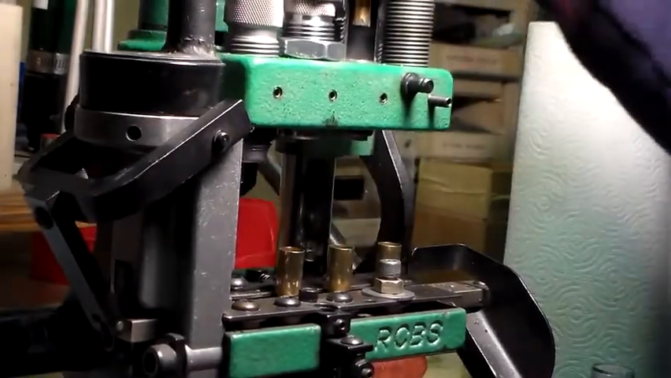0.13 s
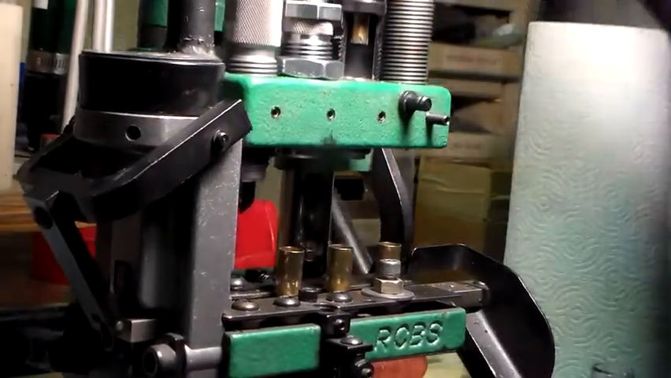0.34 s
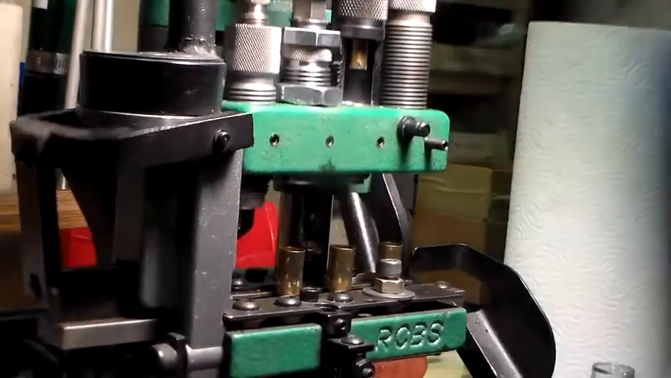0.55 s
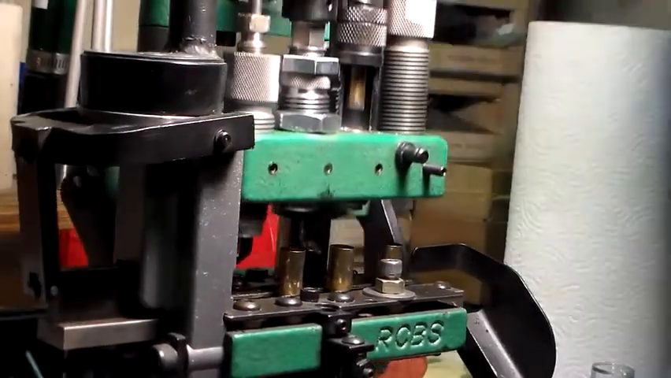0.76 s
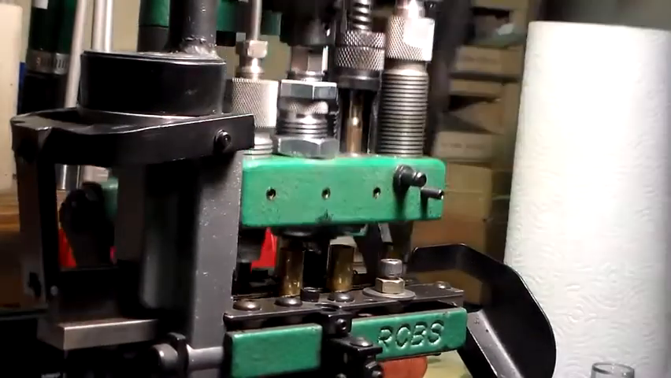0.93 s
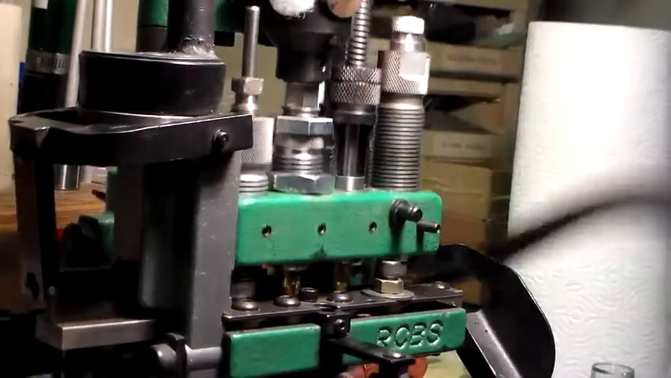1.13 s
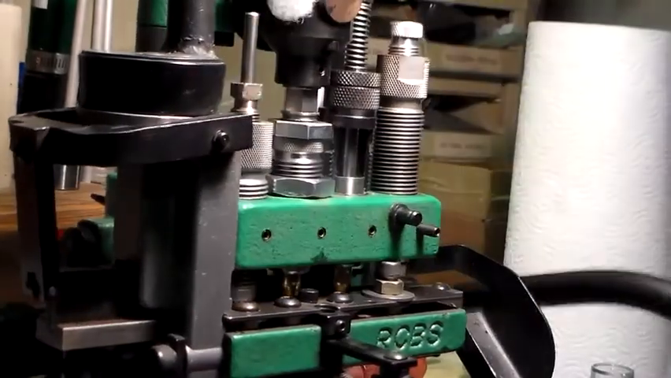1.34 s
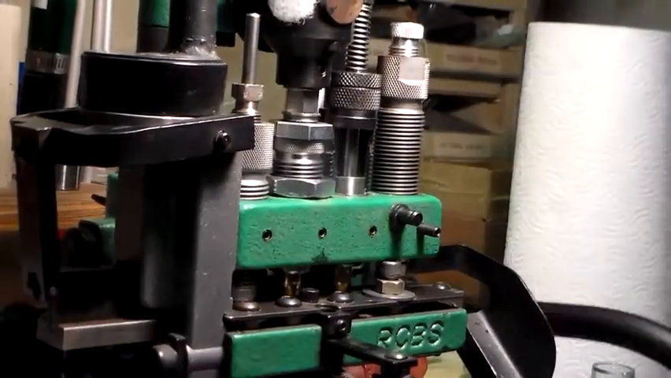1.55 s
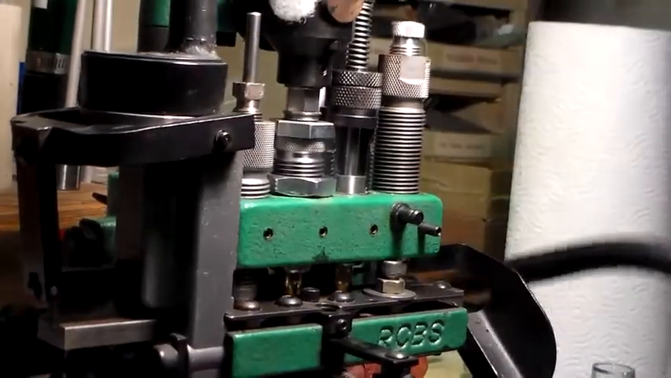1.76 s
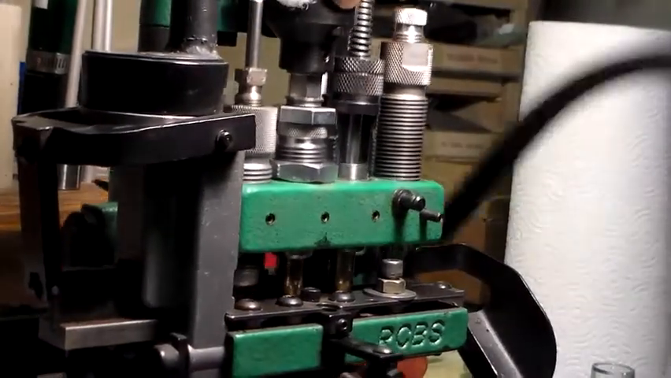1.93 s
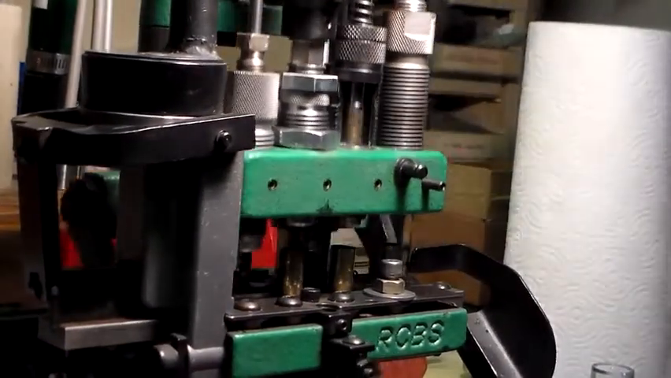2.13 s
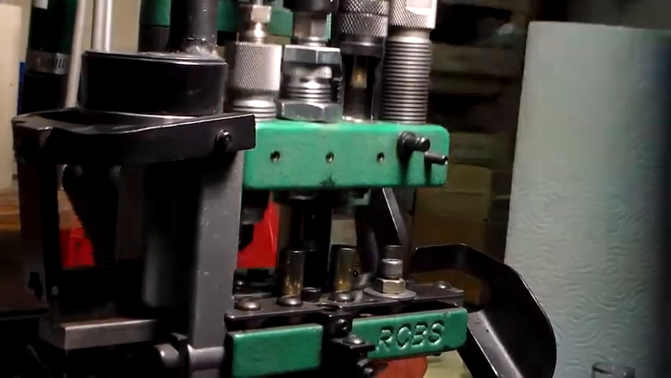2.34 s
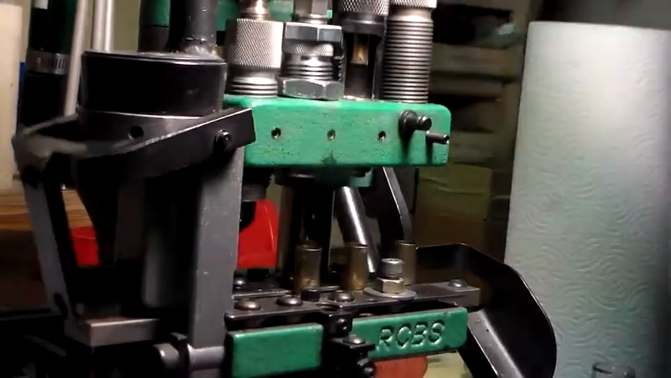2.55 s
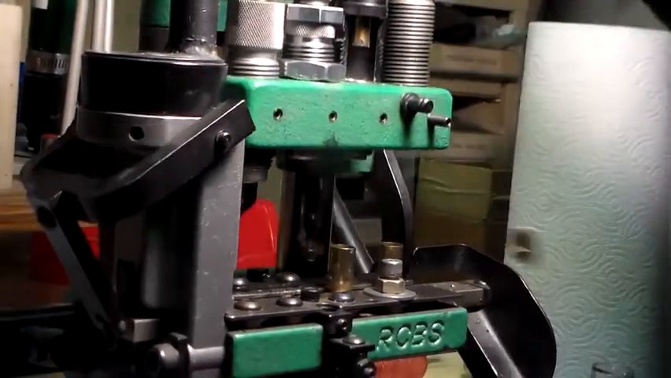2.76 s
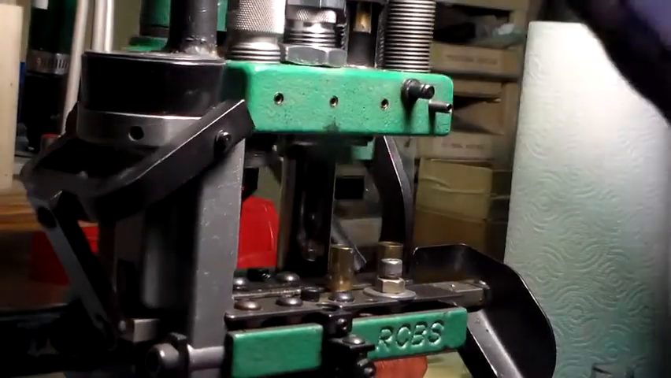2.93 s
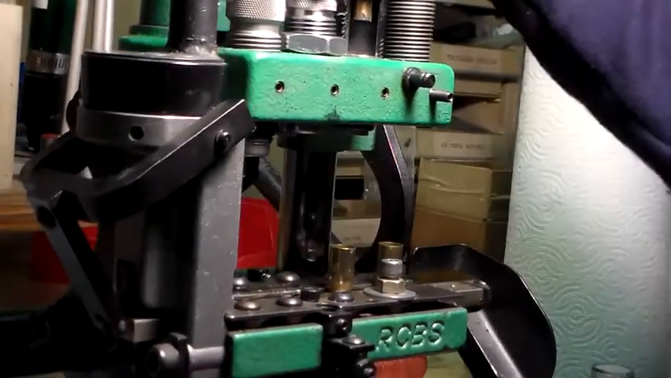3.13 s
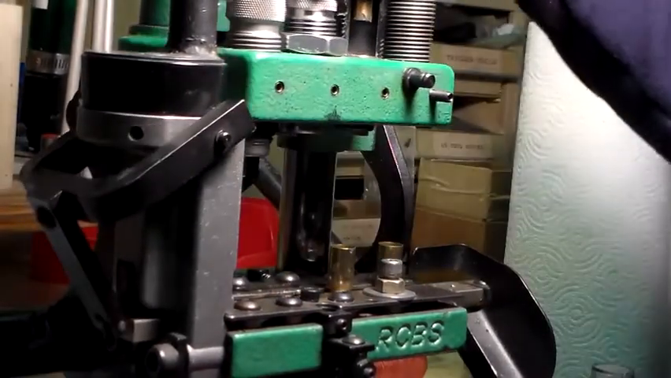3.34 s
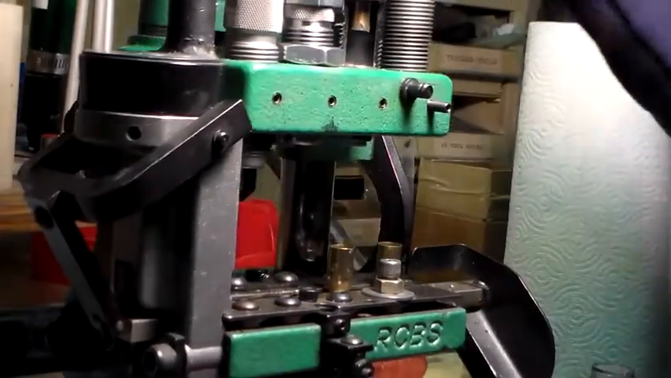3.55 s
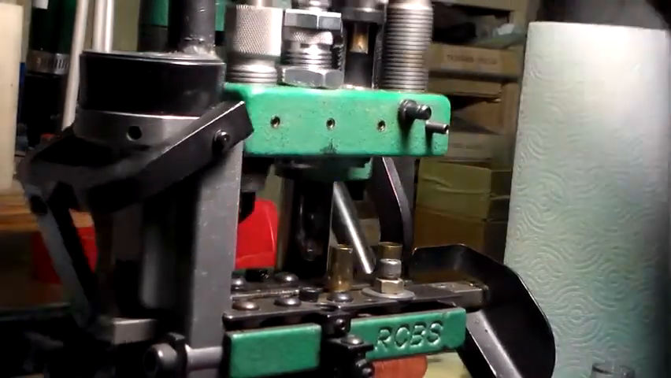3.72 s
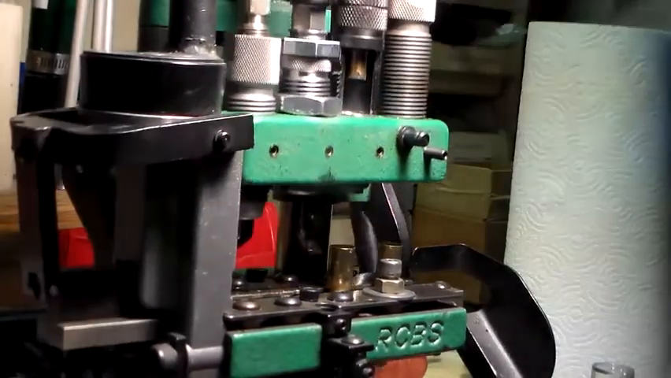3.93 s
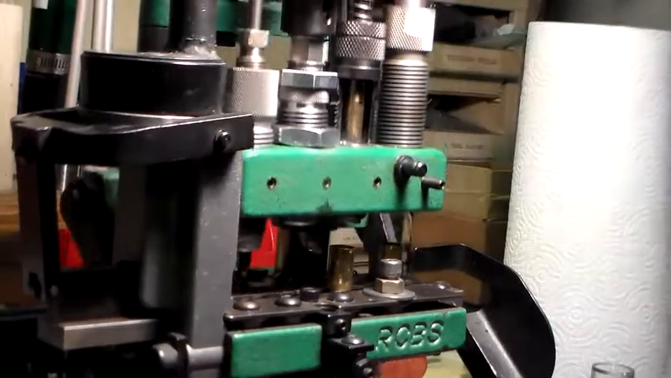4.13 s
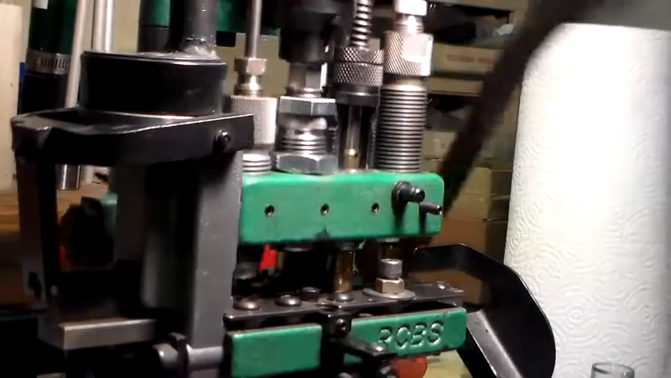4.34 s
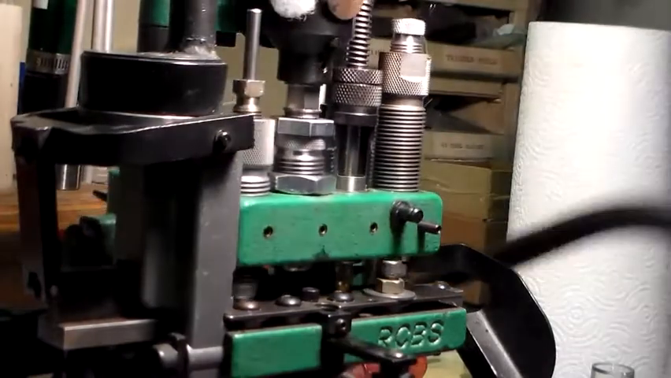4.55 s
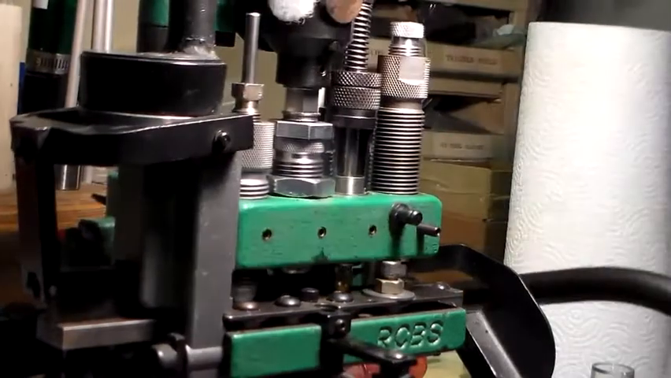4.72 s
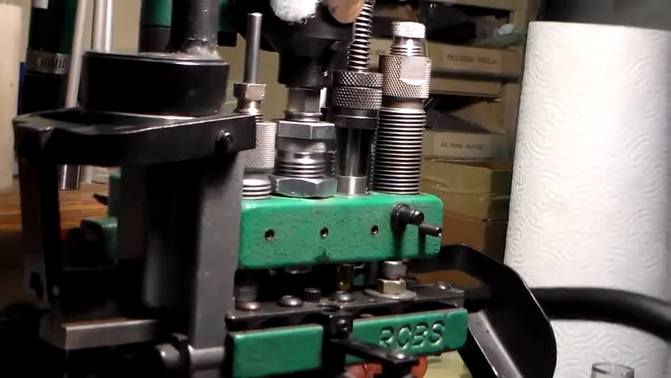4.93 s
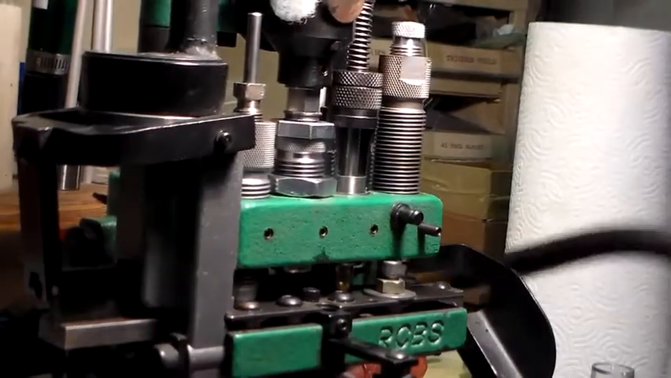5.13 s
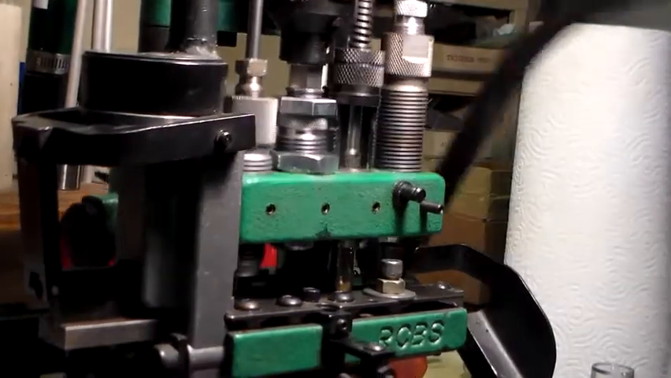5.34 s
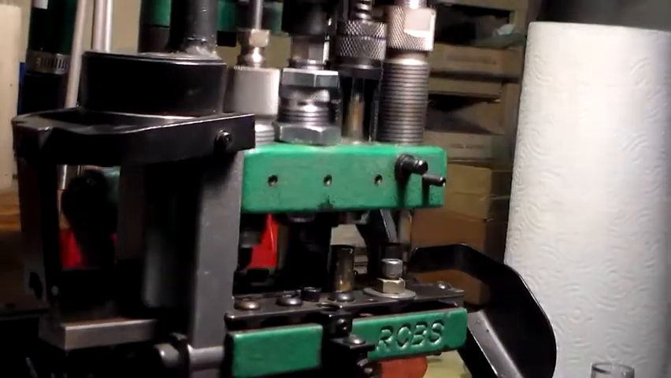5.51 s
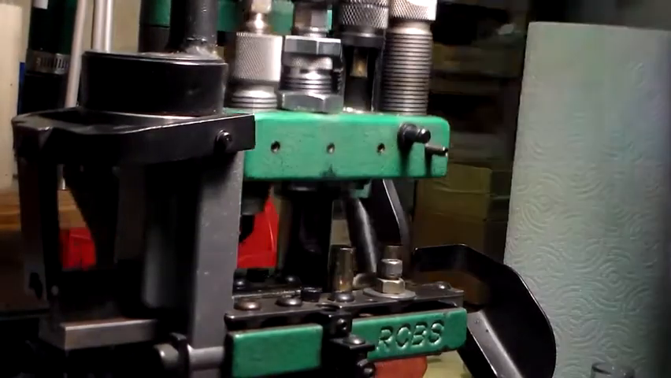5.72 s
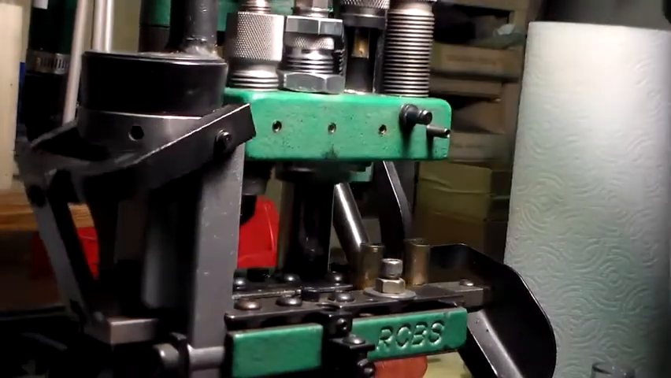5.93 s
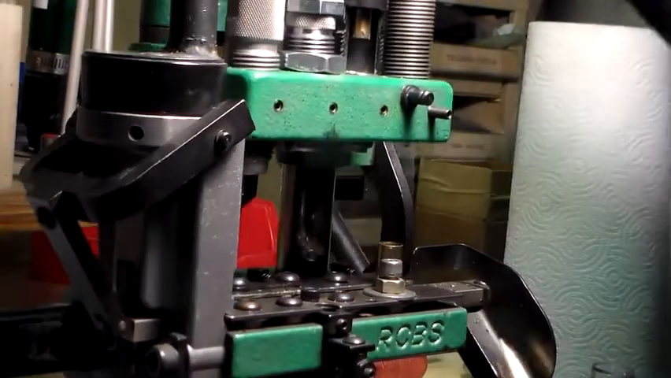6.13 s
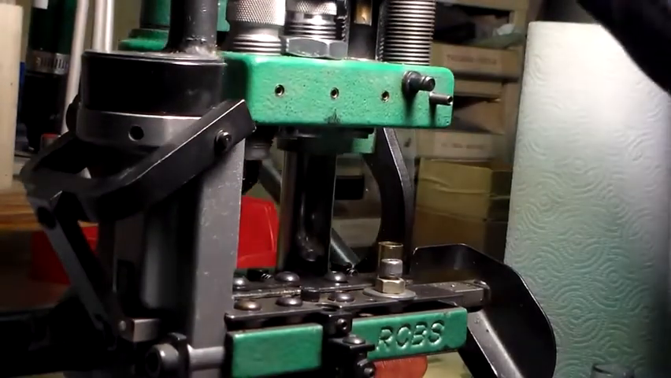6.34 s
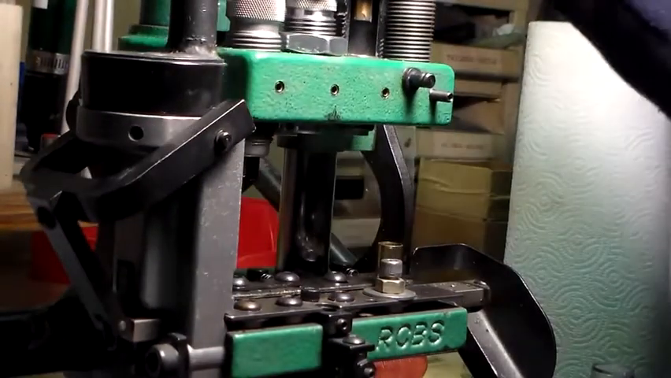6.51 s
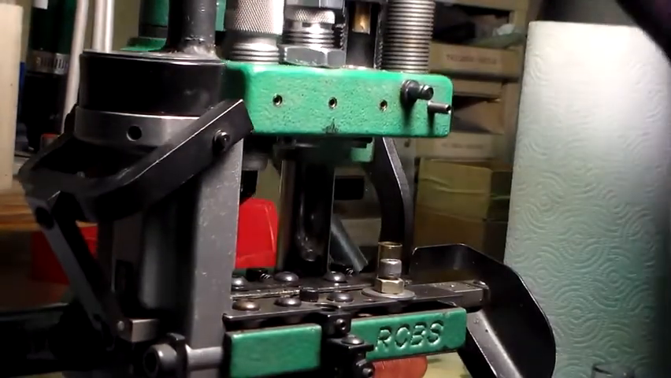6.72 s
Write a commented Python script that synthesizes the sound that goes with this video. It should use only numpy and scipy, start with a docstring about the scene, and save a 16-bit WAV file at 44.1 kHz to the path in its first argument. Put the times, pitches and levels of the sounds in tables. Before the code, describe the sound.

Close to a hand-operated steel press in a small workshop: faint ticks, then a bright hard snap, a muffled clunk at the bottom of the stroke, scraping guides and skittering brass on the return. A very loud clack and lever rattle end the cycle. A second, similar stroke follows with clustered snaps, clunks and a final sharp knock, over low room air and faint motor hum.

```python
"""A steel reloading press is worked by hand through two strokes on a bench in a small workshop.
Its linkage clunks and its pawls and detents snap: shaped noise, part resonances and frame modes.
Brass cases, springs and rods ring as pairs of decaying modes; guides, cases and lever rub as noise
broken by slips. The bench rumbles as coloured noise, over room air and a distant motor's hum;
a short, dry room echoes the knocks, and a limiter ducks after loud treble."""
import sys
import numpy as np
from scipy import signal
from scipy.fft import rfft, irfft
from scipy.io import wavfile
from scipy.ndimage import uniform_filter1d

SR = 44100
rng = np.random.default_rng(int(sys.argv[2]) if len(sys.argv) > 2 else 0)


def to_wav(sig):
    """Store sig (one row per channel, or 1-D mono) as 16-bit WAV at the path in sys.argv[1].

    Samples outside -1..1 are clipped; the rate is SR.
    """
    pcm = np.clip(np.atleast_2d(sig), -1, 1) * 32767
    pcm = np.round(pcm).astype(np.int16)
    wavfile.write(sys.argv[1], SR, pcm.T)  # frames by channels


N = 298557
TIME = np.arange(N) / SR  # s
BLOW = TIME[:16384]  # time axis of one blow, s
MIC_SPACING_M, SOUND_SPEED_M_S = 0.023, 343


def undb(db):
    """Level law: decibels become an amplitude gain."""
    return 10 ** (np.asarray(db) / 20)


def unit(x):
    """Energy normalisation: the mean energy per channel becomes one."""
    return x / np.sqrt(np.mean(np.sum(x ** 2, axis=-1)))


def add(out, start_s, x):
    """Superposition: mix x into out from start_s."""
    i = max(int(start_s * SR), 0)
    out[..., i:i + x.shape[-1]] += x[..., :N - i]


def freqs(x):
    """Fourier analysis: bin frequencies of the spectrum of x in Hz, held to at least 1."""
    return np.maximum(np.fft.rfftfreq(x.shape[-1], 1 / SR), 1)


def diffuse(size):
    """Diffuse-field coherence: two close microphones agree in the bass and differ in the treble."""
    noise = rng.standard_normal((2, size))
    alike = .97 * np.sinc(2 * freqs(noise) * MIC_SPACING_M / SOUND_SPEED_M_S)
    mid, side = irfft(rfft(noise) * np.sqrt([1 + alike, 1 - alike]), size)
    return np.array([mid + side, mid - side]) / np.sqrt(2)


def colour(x, points):
    """Spectral shaping: interpolate the level points over log frequency, then set the rms to one."""
    hz, db = np.transpose(points)
    gain = undb(np.interp(np.log(freqs(x)), np.log(hz), db))
    shaped = irfft(rfft(x) * gain, x.shape[-1])
    return shaped / shaped.std()


def fade(t60):
    """Exponential damping: the level falls 60 dB in t60 seconds."""
    return np.exp(-np.log(1000) * BLOW / t60)


def mode(hz, t60):
    """Damped free vibration: one decaying sine."""
    return np.sin(2 * np.pi * hz * BLOW) * fade(t60)


def walk(rate, size=N):
    """Smoothed random process: a new target rate times a second, with a spread near one."""
    k = int(SR / rate)
    steps = np.repeat(rng.standard_normal(size // k + 1), k)
    return uniform_filter1d(steps, k)[:size]


def swells(rows):
    """Addition of powers: each push builds to a peak and dies away, giving a gain over time."""
    t, power = np.arange(0, N / SR, .001), 0
    for peak_s, level_db, rise_s, fall_s in rows:
        span_s = np.maximum(np.where(t < peak_s, rise_s, fall_s), .01)
        away = np.abs(t - peak_s) / span_s
        power = power + undb(level_db - 20 * away ** 0.99) ** 2
    return np.interp(TIME, t, np.sqrt(power))


# still air of the workshop: pitch_hz [Hz], relative level_db [dB per Hz]
AIR_SPECTRUM = [(15, -33.5), (25, 0), (82, -10.5), (344, -10.5), (632, -22), (1100, -28), (2780, -39.5),
                (3530, -30), (4140, -31.5), (14000, -30.5)]
AIR_DB = -55
# distant motor: multiples of its turning rate that hum [1], and the rms level_db of each [dB]
MOTOR_MULTIPLES = [1, 2, 6, 12]
MOTOR_DB = [-60.5, -63, -67, -65]
MOTOR_HZ = 28.98  # mean turns per second


def room_tone():
    """Steady noise and harmonics: air murmurs and faintly hisses while a motor's speed wanders."""
    turns = np.cumsum(MOTOR_HZ * (1 + 0.00605 * walk(3))) / SR
    hum = 0
    for multiple, level_db in zip(MOTOR_MULTIPLES, MOTOR_DB):
        phase = 2 * np.pi * (multiple * turns + rng.random())
        hum = hum + undb(level_db) * np.sqrt(2) * np.sin(phase)
    return undb(AIR_DB) * colour(diffuse(N), AIR_SPECTRUM) + hum


# spectrum of the shaken bench: pitch_hz [Hz], relative level_db [dB]
BENCH_SPECTRUM = [(18, -1.5), (29, -5), (40, -8), (55, 7), (85, 5), (125, -10.5), (180, -6), (330, -5),
                  (500, -16), (1000, -57.5)]
# bench shaken as the load comes on or off:
# peak_s [s], relative level_db [dB], rise_s and fall_s over 20 dB [s]
BENCH_RUMBLES = [(.56, -40, .04, .5), (1.36, -37.5, 0.1, .5), (1.695, -29.5, 0.11, 0.1),
                 (1.87, -41, .3, 0.4), (2.66, -42, 0.2, 0.8), (3.2, -42, 0.4, 0.4), (3.62, -46, .3, .4),
                 (3.87, -38.5, 0.08, 0.4), (4.76, -43, 0.1, 0.5), (5.98, -43, 0.15, 0.9),
                 (6.57, -46, .15, .3)]


def bench():
    """Forced vibration: the bench top rumbles as the lever loads and releases it."""
    wander = undb(1.5 * walk(10))
    return undb(-2.5) * colour(diffuse(N), BENCH_SPECTRUM) * swells(BENCH_RUMBLES) * wander


PATCHY_DB, PATCHES_PER_S = 3, 51  # unevenness of the drag


def friction(level, spectrum, rate, slip_t60, slip_share):
    """Stick-slip friction: smooth drag breaks into clusters of tiny, uneven slips."""
    # slips fall at random, on average rate times a second
    slip_size = undb(4 * np.minimum(rng.exponential(size=N), 3))
    slips = (rng.random(N) < rate / SR) * slip_size
    # each slip adds a decaying burst of power
    rattle = np.abs(signal.fftconvolve(slips ** 2, fade(slip_t60) ** 2)[:N])
    share = np.clip(slip_share, 0, .9)
    grip = np.sqrt(1 - share + share * rattle / rattle.mean())
    patches = undb(PATCHY_DB * walk(PATCHES_PER_S))
    return colour(diffuse(N) * grip * patches, spectrum) * level


# spectra of rubbing guides, sliding cases and ringing lever: pitch_hz [Hz], relative level_db [dB]
GUIDE_SPECTRUM = [(200, -9.5), (400, -14), (700, 9), (1200, 4), (1600, 6), (2800, -2), (4100, 0.5),
                  (5500, -13.5), (9000, -34.5)]
CASE_SLIDE_SPECTRUM = [(2500, -21), (4500, 8.5), (7500, 9), (11000, 6), (13500, -6), (16000, -32.5)]
LEVER_SPECTRUM = [(300, -31), (540, -10.5), (750, 5), (920, -1), (1100, -5.5), (1420, -4), (1900, -3),
                  (2400, -7), (4200, -11), (9000, -41.5)]
# ram and linkage scraping in their guides, brass cases skidding on steel, and the lever chattering
# in its pivot and against its rest:
# peak_s [s], relative level_db [dB], rise_s and fall_s over 20 dB [s; below 0.01 acts as 0.01]
GUIDE_RUBS = [(.55, -53, -1.5, 0.3), (1.38, -44.5, 0.2, 0.34), (1.67, -43, 0.04, 0.28),
              (2.66, -43, 0.13, 0.17), (2.89, -44, 0.2, 0.04), (3.85, -48.5, -0.74, 0.22),
              (4.75, -53, 0.34, 0.77), (5.96, -59.5, 1.56, 0.56), (6.21, -47, 0.7, -0.1)]
CASE_SKIDS = [(.66, -44.5, 0.015, 0.2), (5.925, -35.5, .033, .37), (1.67, -49, 0.04, .5),
              (2.68, -38.5, 0.1, .35), (3.95, -44, .02, 0.18), (6.12, -49.5, 0.4, 0.55)]
LEVER_CHATTERS = [(.035, -44.5, 4, 0.26), (.9, -49, 0.5, 0.12), (2.38, -52.5, 0.36, 0.14),
                  (3.45, -32.5, -0.01, 0.19), (3.56, -49, -0.3, 0.4), (4.18, -53, 1.25, 0.1),
                  (6.55, -46.5, -0.2, 0.21)]


def sliding():
    """Friction-excited vibration: steel rubs in guides, brass skitters on steel, the lever chatters."""
    rub = friction(swells(GUIDE_RUBS), GUIDE_SPECTRUM, rate=130, slip_t60=0.035, slip_share=0.6)
    skid = friction(swells(CASE_SKIDS), CASE_SLIDE_SPECTRUM, rate=260, slip_t60=0.014, slip_share=0.6)
    chatter = friction(swells(LEVER_CHATTERS), LEVER_SPECTRUM, rate=430, slip_t60=0.032, slip_share=0.23)
    return undb(-1.0) * rub + undb(-2.0) * skid + undb(0.5) * chatter


# brass cases, springs and rods ringing after a knock, and one short creak near 2 kHz: # start_s [s], pitch_hz
# [Hz], relative level_db [dB], t60_s [s], left_minus_right_db [dB]
METAL_RINGS = [(.004, 8290, -31.5, 0.32, 11), (.704, 4200, -57.5, .7, -3), (2.832, 7865, -37.5, 0.49, 3),
               (3.324, 8320, -33.5, 0.35, 13), (3.43, 8480, -41, 0.6, 3), (3.505, 7860, -40.5, 0.32, -10),
               (3.529, 8400, -41.5, 0.16, 12), (5.033, 2000, -38.5, 0.088, -0.5),
               (6.227, 7666, -48, 0.6, -4.5), (6.249, 13114, -25.5, 0.21, -6), (6.254, 8660, -36, 0.3, -13),
               (6.275, 4110, -42.5, 0.21, -5)]


def ringing_metal():
    """Split modes: brass cases, springs and rods ring in close pairs, and flutter."""
    out = np.zeros((2, N))
    swell = 1 - np.exp(-BLOW / 0.0035)
    for start_s, pitch_hz, level_db, t60_s, pan_db in METAL_RINGS:
        # each microphone hears its own partner beside the main mode
        split_hz = 25 * rng.standard_normal(2)
        ring = np.array([mode(pitch_hz, t60_s) + 0.4 * mode(pitch_hz + d, t60_s) for d in split_hz])
        channel_db = level_db + np.array([[pan_db], [-pan_db]]) / 2
        add(out, start_s, undb(channel_db) * ring * swell)
    flutter = undb(3.5 * np.array([walk(140), walk(140)]))
    return out * flutter


def strikes(contacts):
    """Repeatable impact: one row per strike, (start_s, t60_s, resonances, level_db of each register)."""
    rows = []
    for t60_s, resonances, shape_db, hits in contacts:
        for start_s, level_db in hits:
            rows.append((start_s, t60_s, resonances, *np.add(level_db, shape_db)))
    return rows


def even_out(x):
    """Spectral whitening: peaks and dips are levelled, as when a burst is summed over all directions."""
    spectrum = rfft(x)
    return irfft(spectrum / (np.abs(spectrum) + 1e-12), len(x)) * (BLOW < .2)


# borders of the registers thump, body, clack, snap and tick: pitch_hz [Hz]
REGISTER_BORDERS = [60, 440, 1200, 3000, 6000, 14500]
# press frame on its bench, rung by every blow: pitch_hz [Hz], relative level_db [dB], t60_s [s]
FRAME_MODES = [(204, 6, 0.15), (393, 2.5, 0.15), (511.7, 4.5, 0.19), (637, 10.5, 0.13), (808.7, 8.5, 0.08),
               (921, 5.5, 0.066), (1036, -1, 0.2), (1180, -1.5, 0.088), (1463, -11, 0.33), (1493, 7, 0.023),
               (1665, 3, 0.067), (2140, -6, 0.19), (3507, -1.5, 0.015), (4165, -7, 0.023)]
# each register is steep below and rolls off gently above, like a cushioned contact
REGISTERS = [
    np.vstack([signal.butter(5, low, "high", fs=SR, output="sos"),
               signal.butter(3, .9 * high, fs=SR, output="sos")])
    for low, high in zip(REGISTER_BORDERS, REGISTER_BORDERS[1:])]
THUMP_FRAME_DB = -5  # the frame rings less in the lowest register
CHOKE_HZ = 1260  # resonances above this die sooner
ALL_ROUND_TONES_DB = -8.5  # how much of the resonances reaches the room
FRAME_ROUGH_DB, FRAME_ROUGH_PER_S = 4, 140  # loose joints make the frame's ring stutter


def blows(table, tail_db, frame_db, rise_share, bass_hold):
    """Impact excitation: a contact drives a dense short ring, the part's resonances and the frame.
    Returns the direct sound and the sound sent all round, in which the resonances even out."""
    out = np.zeros((2, 2, N))
    frame_modes = np.array([undb(db) * unit(mode(hz, t60)) for hz, db, t60 in FRAME_MODES])
    for start_s, t60, resonances, *levels in table:
        # the press stands straight ahead, so both microphones hear much the same
        noise = diffuse(len(BLOW))
        noise = noise + 0.2 * noise[::-1]
        # each point of contact excites the frame's modes differently
        sign, spread = rng.standard_normal((2, len(FRAME_MODES)))
        frame = (np.sign(sign) * undb(3 * spread)) @ frame_modes
        # the modes shift slightly in pitch from blow to blow
        frame = np.interp(BLOW * rng.uniform(.992, 1.008), BLOW, frame)
        frame = frame * undb(FRAME_ROUGH_DB * walk(FRAME_ROUGH_PER_S, size=len(BLOW)))
        detune = rng.uniform(.985, 1.015)
        # tables with four levels start at the body register
        for k, level_db in enumerate(levels, len(REGISTERS) - len(levels)):
            low, high = REGISTER_BORDERS[k:k + 2]
            # low registers build up later and ring longer
            slow = (1500 / np.sqrt(low * high)) ** bass_hold
            # brief contacts start hardest
            rise = 1 - np.exp(-BLOW / (rise_share * t60 * slow))
            ring = unit(rise * fade(t60 * slow))
            shape = ring + undb(tail_db) * unit(rise * fade(0.05 * slow))
            # the tiny offset keeps the filter input from vanishing
            sound = unit(signal.sosfilt(REGISTERS[k], noise * shape + 1e-18))
            tones = 0
            for pitch_hz, mode_db in resonances:
                if low <= pitch_hz < high:
                    # small parts stay pressed against the steel, so high modes are choked
                    freedom = min(1, CHOKE_HZ / pitch_hz)
                    tone = mode(pitch_hz * detune, t60 * slow * freedom) * rise
                    tones = tones + undb(mode_db) * unit(tone)
            if low < FRAME_MODES[-1][0]:
                # in the thump the wooden bench takes over from the frame
                frame_gain = undb(frame_db + (THUMP_FRAME_DB if k == 0 else 0))
                sound = sound + frame_gain * unit(signal.sosfilt(REGISTERS[k], frame * rise))
            all_round = sound
            if low >= REGISTER_BORDERS[2]:
                # the higher registers leave differently in every direction
                even = even_out(noise[0] * shape) + 1e-18
                all_round = np.tile(unit(signal.sosfilt(REGISTERS[k], even)), (2, 1))
            direct = unit(sound + tones)
            sent = unit(all_round + undb(ALL_ROUND_TONES_DB) * tones)
            add(out, start_s, undb(level_db) * np.array([direct, sent]) * np.sqrt(SR / 100))
    return out


# light contacts of pawls, latch, carrier, cases, feed bar, detent and lever, grouped by kind of contact:
# base t60_s [s], resonances (pitch_hz [Hz], level_db over the dense ring [dB]),
# (body, clack, snap, tick) level_db [dB], strikes (start_s [s], relative level_db [dB])
LIGHT_CONTACTS = [ (0.14, [(3400, -3)], (-12.5, -3, 1, -1.5), [(.4575, -42), (3.7755, -39)]),
                  (0.11, [(4700, 3.5)], (-8.5, -7, -2.5, -7.5), [(.5925, -45), (3.888, -38.5)]),
                  (0.089, [(4720, 7)], (-33.5, -13.5, -1.5, 1), [(.646, -31.5), (3.9365, -32.5)]),
                  (0.082, [(3950, -5), (4130, 13), (4400, 0)], (-22, -2.5, 0.5, -4), [(.698, -39),
                  (.7014, -16.5), (3.9795, -27.5), (3.983, -19), (3.9968, -33)]), (0.0535, [(690, 2.5),
                  (1060, 6.5), (1520, 0.5), (1780, -3), (2250, 1)], (-3.5, -3.5, -15, -31), [(.7052, -24.5),
                  (.711, -28.5), (3.9855, -20), (3.992, -32)]), (0.11, [(660, -2.5), (1900, -5.5)],
                  (-3, -2.5, -4, -6.5), [(1.0307, -43.5), (4.31, -43)]), (0.13, [(870, -1.5)],
                  (-3, 0, -1, -10.5), [(1.2, -48), (1.2724, -44), (4.6809, -43), (4.9876, -53)]),
                  (0.066, [(2450, 0)], (-13.5, -5, -8.5, -19), [(.5017, -40.5), (1.457, -40), (1.5255, -37),
                  (1.537, -37), (3.812, -38), (4.52, -51), (4.6614, -49), (4.72, -39), (4.8714, -49.5),
                  (4.946, -45.5), (5.1423, -48)]), (0.022, [(572, 17), (2450, 1.5)], (-5.5, -4.5, -28, -20),
                  [(5.2817, -45.5), (5.3845, -36), (5.5219, -37.5)]), (0.082, [(1700, -5.5), (4400, -2.5)],
                  (-5, -0.5, -2, -10), [(1.9532, -39), (2.0132, -41), (5.3348, -33.5)]), (0.041, [(2800, 2),
                  (4150, 1.5)], (-16, -3.5, -0.5, -4), [(1.8145, -43.5), (2.0835, -34.5), (2.4853, -52.5),
                  (5.454, -31)]), (0.035, [(950, 7.5), (1686, -7.5)], (-4, 0, 2, -3.5), [(2.2838, -38.5),
                  (5.6325, -34.5)]), (0.065, [(1080, -9), (1600, -6.5), (4780, 3)],
                  (-3.5, -2.5, -1.5, -2.5), [(2.5925, -45.5), (2.5995, -32), (5.8981, -32)]),
                  (0.22, [(7500, -19)], (-19, -4.5, -1.5, 2.5), [(2.669, -42.5), (5.9504, -35.5),
                  (6.072, -36.5)]), (0.047, [(4400, 3), (5200, 3.5)], (-23.5, -16, -1.5, -18),
                  [(2.7231, -41), (2.745, -44.5), (5.991, -50), (6.15, -45)]), (0.042, [(1520, 4.5),
                  (3750, 6)], (-20, -3.5, -10, -24.5), [(2.913, -33), (6.031, -45), (6.1245, -37),
                  (6.309, -53)]), (0.06, [(1700, -1), (4800, -5)], (-5, 0, 1.5, -3.5), [(2.8134, -36.5)]),
                  (0.079, [(1260, 6.5), (4800, 2.5)], (-13.5, 2, -2, -3), [(2.83, -33.5)]),
                  (0.044, [(1080, 3), (1260, 19), (1500, -4)], (-4, -6.5, -12.5, -23.5), [(2.847, -39),
                  (2.8805, -31.5)]), (0.022, [(4130, 3), (7800, -12)], (-32, -12.5, -4.5, 2),
                  [(6.2505, -32), (6.2737, -35.5)]), (.031, [(770, 13), (1500, -3), (3720, 0.5), (4450, 3)],
                  (-11, -3.5, 1, -2.5), [(2.9817, -9), (2.989, -27)]), (0.026, [(540, -5), (730, 0),
                  (2350, -6.5), (4050, -1.5)], (-1, 0, 0, -6.5), [(3.1781, -17.5), (3.3181, -23),
                  (3.3539, -30.5), (6.4415, -13)]), (0.044, [(650, 7.5), (760, 10), (810, 5), (1420, -6),
                  (2420, 3)], (-0.5, -1.5, -4.5, -13), [(.0225, -39.5), (3.3974, -30), (3.425, -24.5),
                  (3.4637, -27), (6.5115, -27.5)]), (0.069, [(760, 8), (915, 9)], (-1, -14, -25, -23),
                  [(3.4355, -33), (3.448, -34), (3.4875, -36), (4.135, -50.5)]), (0.044, [(930, 6),
                  (1400, 0), (4200, 5)], (-4, 0, -7, -13.5), [(.0618, -38.5), (.1816, -50), (3.5465, -41.5),
                  (3.608, -53), (3.6339, -42)])]


def clicks():
    """Short contact time: in hard, light contacts nearly all the sound leaves at once."""
    rows = strikes(LIGHT_CONTACTS)
    return undb(2.5) * blows(rows, tail_db=-16.5, frame_db=-5.0, rise_share=0.011, bass_hold=0.547)


# heavy contacts as slack is taken up, the ram bottoms out, cases break free of the dies,
# the feed bar reaches the end of its travel and the joints knock, grouped by kind of contact:
# base t60_s [s], resonances (pitch_hz [Hz], level_db over the dense ring [dB]),
# (thump, body, clack, snap, tick) level_db [dB], strikes (start_s [s], relative level_db [dB])
HEAVY_CONTACTS = [ (0.045, [(980, -0.5), (1500, -2.5)], (-2.5, 0, 0.5, -13, -21), [(.5224, -29.5),
                  (3.8266, -29)]), (0.4, [(410, -14)], (-1.5, -1, -6.5, -25, -24), [(1.2959, -30.5)]),
                  (0.091, [(1500, -4)], (-7, -2.5, -.5, -15.5, -25.5), [(1.3195, -23), (4.7323, -27),
                  (4.761, -36)]), (0.17, [(1430, -3.5), (2480, -6), (2820, -9)], (-9, -5.5, 0, -8.5, -19.5),
                  [(1.6315, -27), (1.6551, -29)]), (0.074, [(1600, 3), (1850, 3)], (-4.5, -5, 3, -10, -16),
                  [(5.079, -40), (5.099, -41.5)]), (0.031, [(490, -12), (640, -5), (920, -1.5), (1450, 9.5),
                  (1680, 3.5), (4700, -3)], (-10, 0.5, -9.5, -20, -32), [(1.836, -20.5), (1.8425, -26.5),
                  (5.2072, -26), (5.2108, -25), (5.2225, -30.5)]), (0.11, [(780, 0.5), (1130, 0),
                  (1530, -2.5), (1780, -3), (3780, 3.5)], (-22, -9.5, -1, -6.5, -22.5), [(2.8686, -22),
                  (6.177, -22.5)]), (0.055, [(960, -2.5), (1250, 4)], (-5.5, 3.5, -5, -20, -46),
                  [(1.578, -33)]), (0.034, [(635, 9.5)], (-14.5, 0, -15.5, -16.5, -38), [(2.9225, -33),
                  (2.929, -31.5), (5.035, -39), (6.2428, -33.5)])]


def clunks():
    """Cushioned contact: in heavy, oiled joints the load builds more slowly and the bench booms along."""
    rows = strikes(HEAVY_CONTACTS)
    return blows(rows, tail_db=-24, frame_db=0.5, rise_share=0.013, bass_hold=0.68)


def workshop(knocks, room_db, t60, build_s):
    """Reverberation: a small room full of shelves returns a dense, quickly fading echo."""
    direct, all_round = knocks
    build = 1 - np.exp(-(BLOW / build_s) ** 2)
    echo = unit(diffuse(len(BLOW)) * fade(t60) * build)
    sent = all_round.mean(axis=0)[None]
    return direct + undb(room_db) * signal.fftconvolve(sent, echo, axes=1)[:, :N]


def scene():
    """Superposition of sources: the clunks reach the microphones with less echo than the clicks."""
    light = workshop(clicks(), room_db=-4, t60=0.2, build_s=0.0015)
    heavy = workshop(clunks(), room_db=-7.5, t60=0.25, build_s=0.0036)
    return light + heavy + ringing_metal() + sliding() + bench() + room_tone()


LIMIT_DB, RELEASE_DB_PER_S = -21, 25.5  # treble threshold, and how fast the gain comes back


def limiter(x):
    """Gain reduction: a sharp snap pulls the level down at once; it creeps back at a steady rate."""
    treble = signal.sosfilt(signal.butter(2, 1000, "high", fs=SR, output="sos"), x)
    power = uniform_filter1d(np.mean(treble ** 2, axis=0), size=256)
    over_db = 10 * np.log10(np.maximum(power / undb(LIMIT_DB) ** 2, 1))
    recovery_db = RELEASE_DB_PER_S * TIME
    # the running peak holds each reduction, and the recovery slope releases it
    return x * undb(recovery_db - np.maximum.accumulate(over_db + recovery_db))


BASS_LEAN_DB = 5.5  # right over left, in the deepest bass
TOP_HZ = 14100


def record(dry):
    """Linear filtering around a limiter: deep bass leans right, and the highest treble is cut."""
    lean_db = BASS_LEAN_DB / (1 + (freqs(dry) / 200) ** 2)
    channel_gain = undb(np.array([-lean_db, lean_db]) / 2)
    heard = limiter(irfft(rfft(dry) * channel_gain, N))
    return signal.sosfilt(signal.ellip(8, .2, 70, TOP_HZ, fs=SR, output="sos"), heard)


dry = scene()
out = record(dry)
to_wav(out)
```